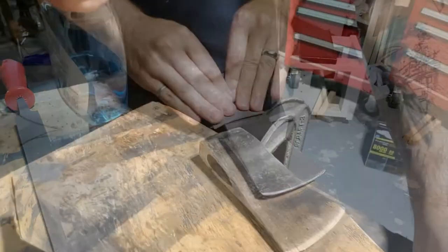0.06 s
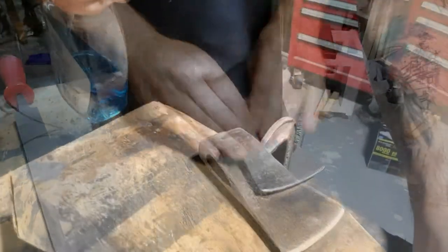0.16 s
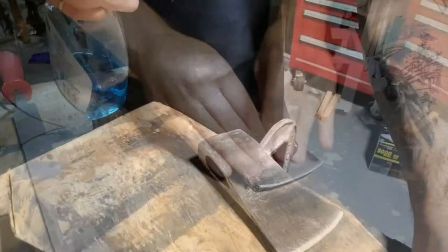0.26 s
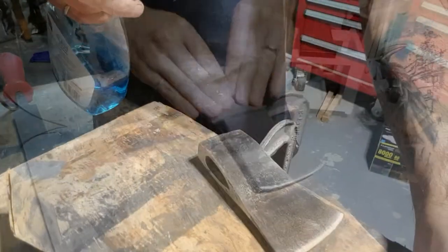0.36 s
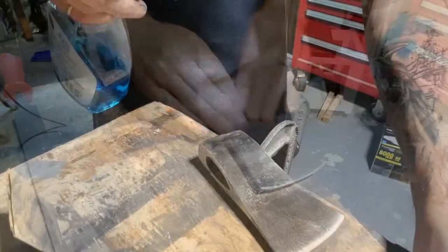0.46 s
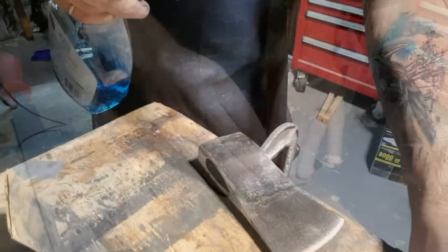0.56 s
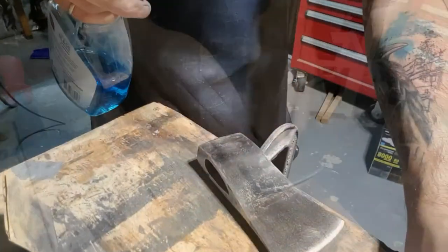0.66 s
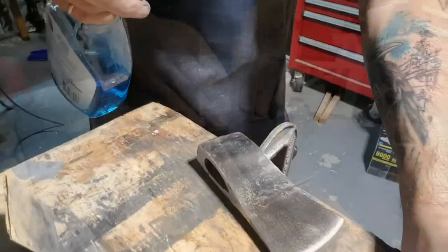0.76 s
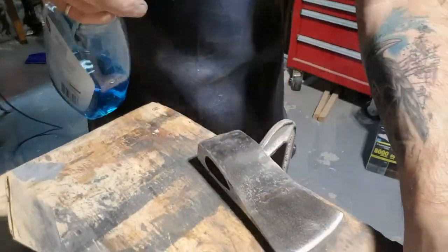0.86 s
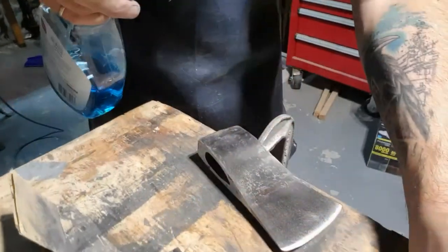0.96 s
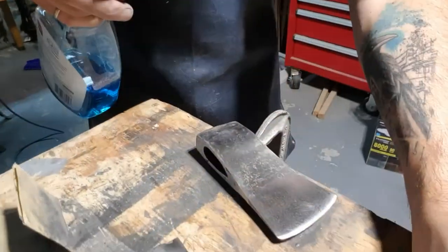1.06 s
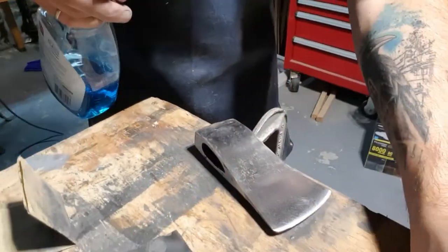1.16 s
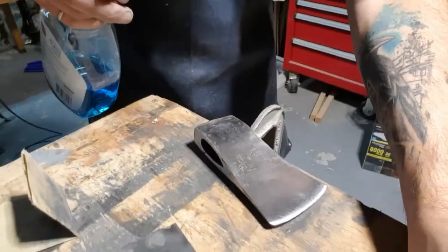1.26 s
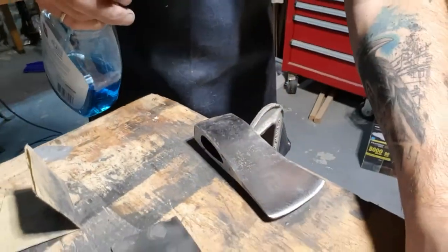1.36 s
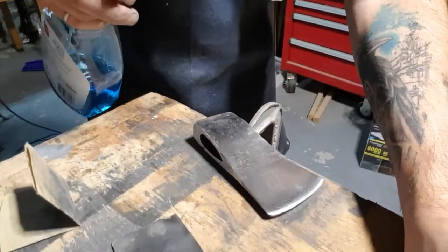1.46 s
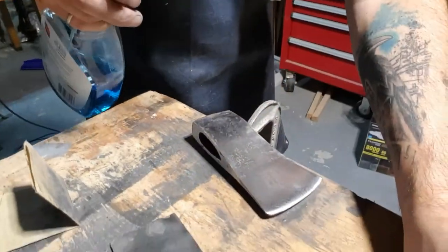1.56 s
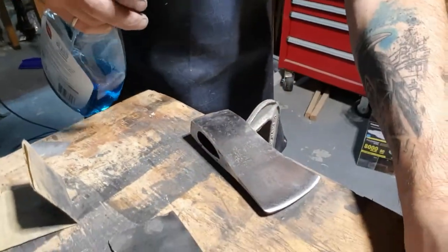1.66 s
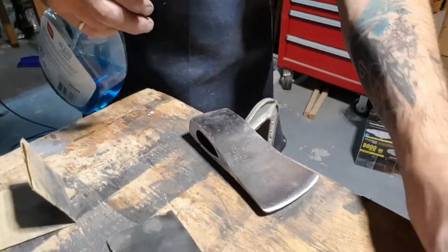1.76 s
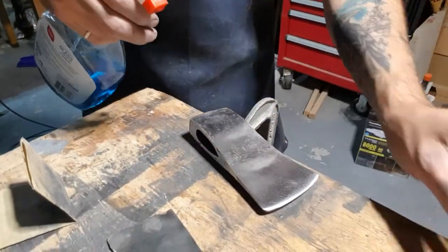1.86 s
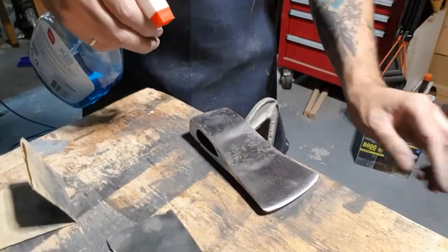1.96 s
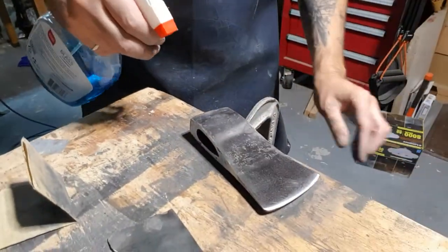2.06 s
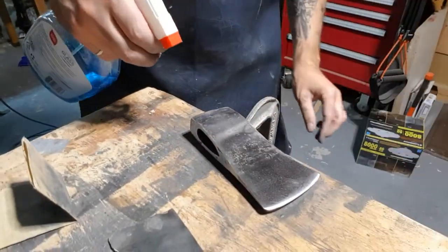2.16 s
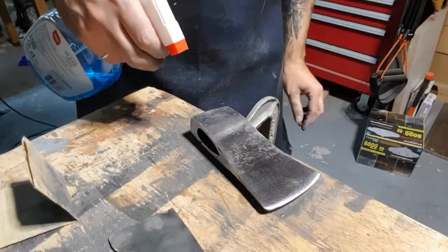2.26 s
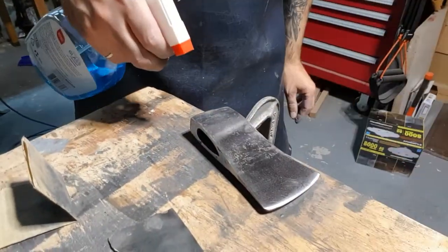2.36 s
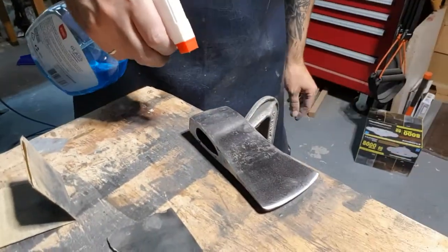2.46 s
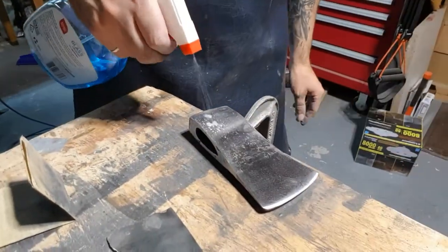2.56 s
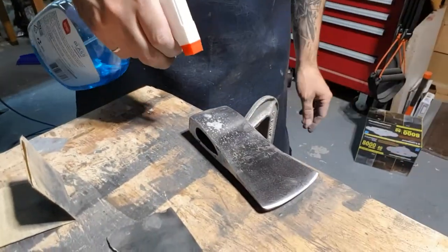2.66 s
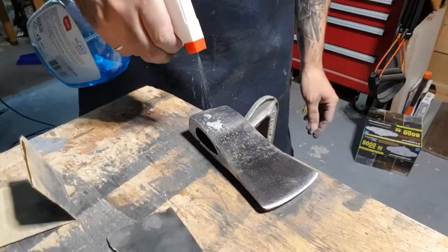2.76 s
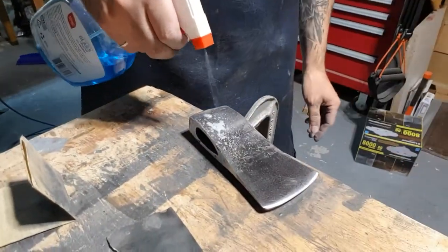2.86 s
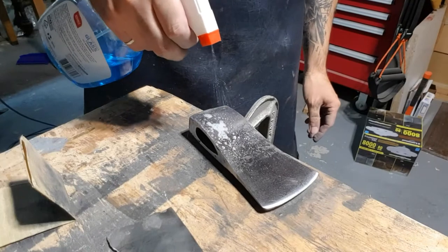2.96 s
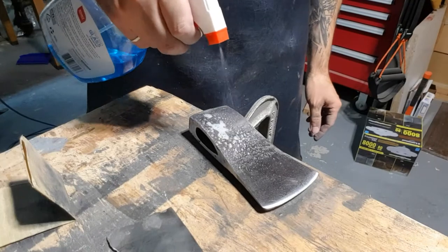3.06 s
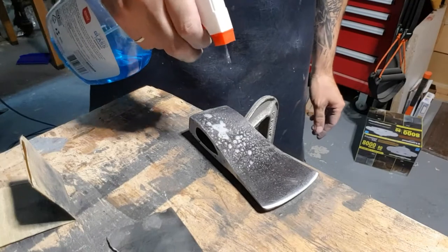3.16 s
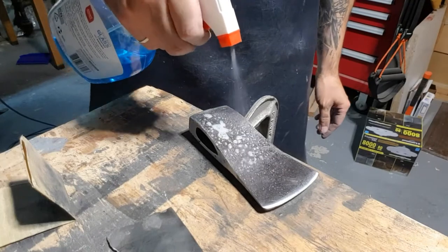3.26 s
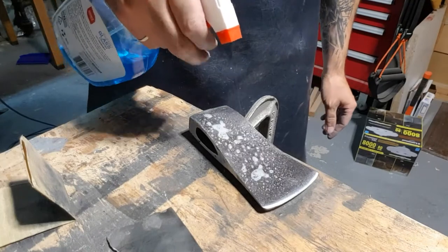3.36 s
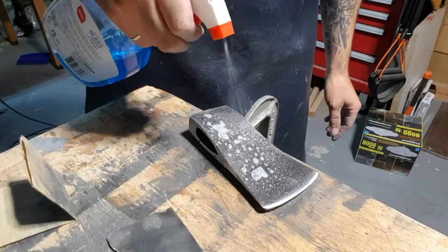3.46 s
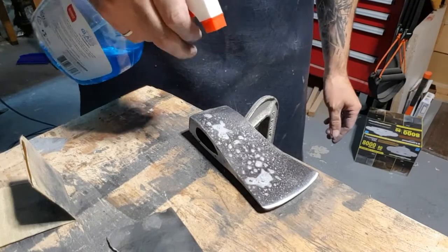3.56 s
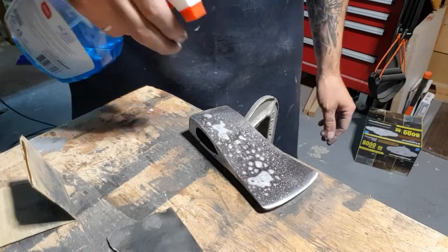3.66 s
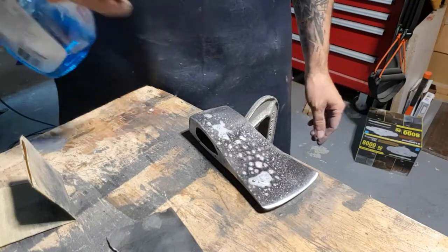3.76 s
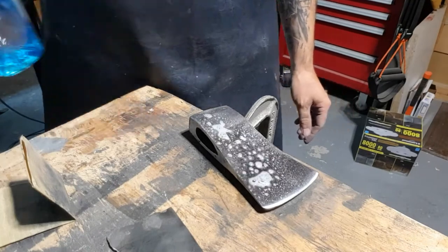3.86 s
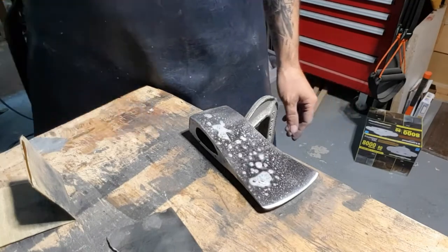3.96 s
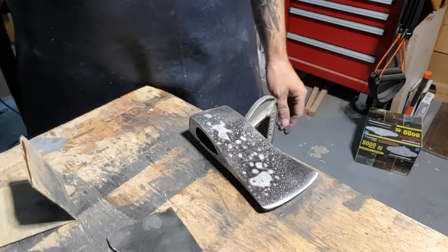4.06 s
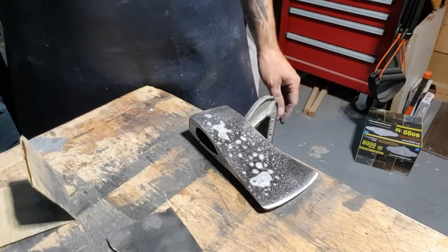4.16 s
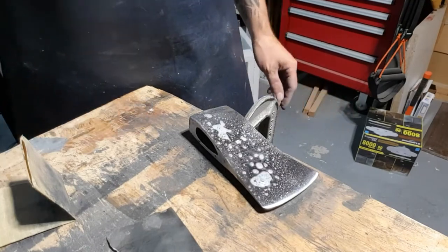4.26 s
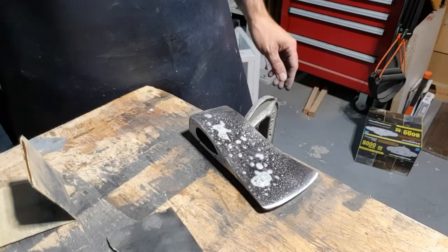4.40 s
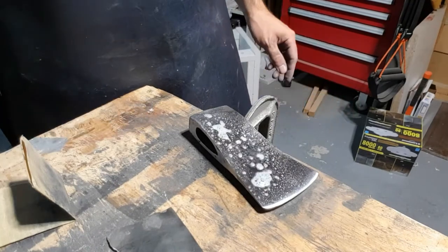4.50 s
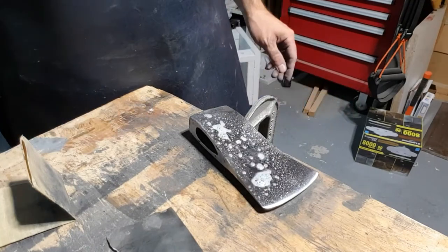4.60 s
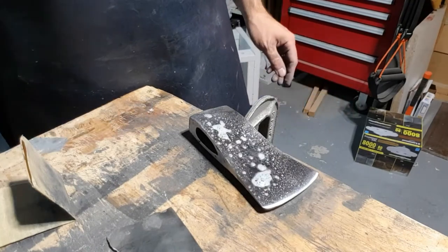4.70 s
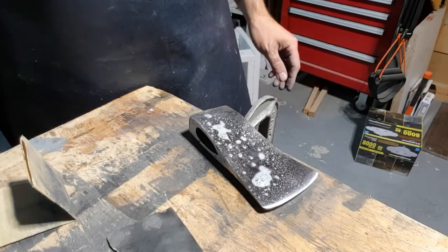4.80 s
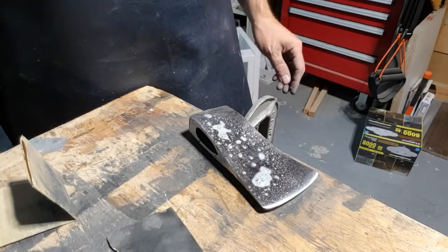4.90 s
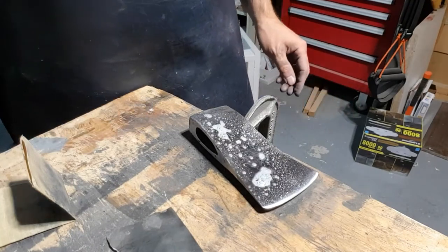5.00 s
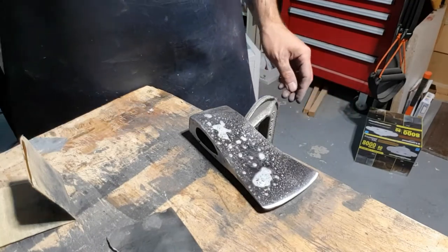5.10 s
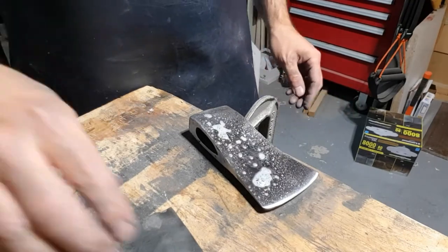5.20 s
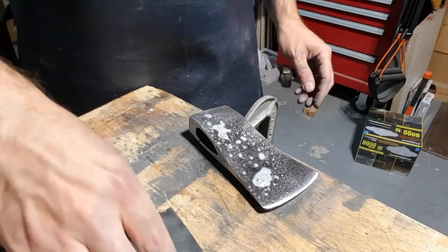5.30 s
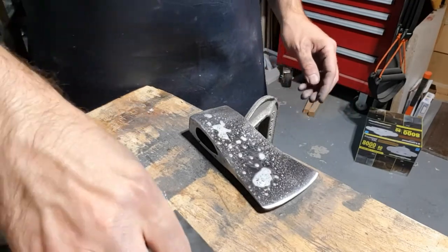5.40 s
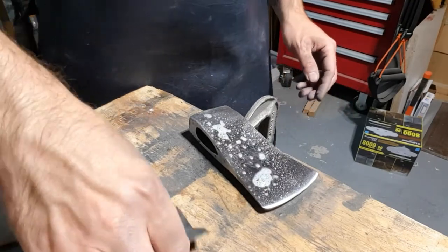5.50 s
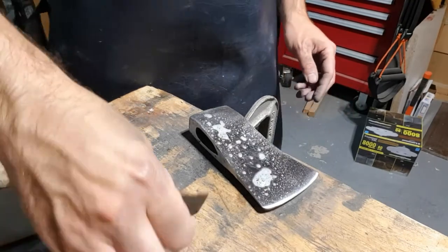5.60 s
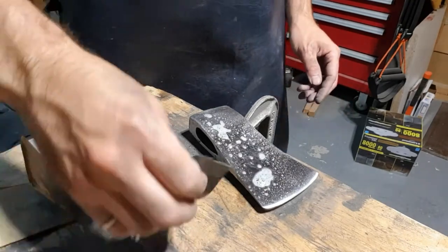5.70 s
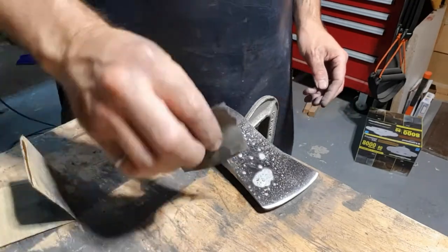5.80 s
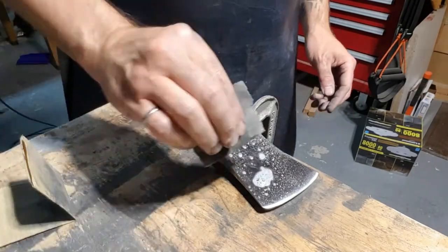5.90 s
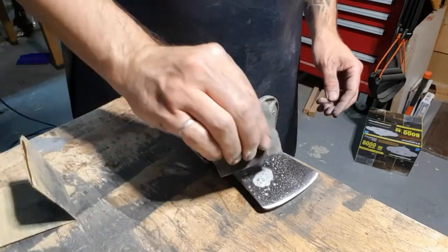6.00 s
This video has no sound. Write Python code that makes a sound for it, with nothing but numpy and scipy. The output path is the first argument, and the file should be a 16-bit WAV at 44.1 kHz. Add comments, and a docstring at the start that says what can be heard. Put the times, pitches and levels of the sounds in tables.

```python
"""Sandpaper strokes on a steel axe head fade away first, then something slides over the bench. A trigger
bottle puffs and sprays in four full squeezes, its piston creaking, and is set down with a knock; a hand
picks up sandpaper. Mains hum and room hiss lie underneath. Rubbing and flow are filtered grainy noise;
the struck shelf and brief ringing in the pump are decaying sines; slips and clicks are pulses and noise
bursts shaped by resonances."""
import sys
import numpy as np
from scipy import signal
from scipy.fft import rfft, irfft, next_fast_len
from scipy.io import wavfile
from scipy.ndimage import uniform_filter1d, map_coordinates

SR = 44100
rng = np.random.default_rng(int(sys.argv[2]) if len(sys.argv) > 2 else 0)


def voltage_ratio(decibels):
    """Convert decibels (scalar or array-like) to amplitude ratios, 20 dB per decade."""
    exponent = np.asarray(decibels, float) / 20
    return 10 ** exponent


def output_pcm(signal):
    """Save a mono or channel-first signal as 16-bit PCM at the path in sys.argv[1].

    Samples are clipped to [-1, 1] before scaling.
    """
    pcm = np.clip(np.atleast_2d(signal).T, -1, 1) * 32767
    wavfile.write(sys.argv[1], SR, np.round(pcm).astype(np.int16))


N = 266364  # samples

# Full squeezes of the trigger. Each row: first piston slip and last slip in seconds, first gap and
# settled gap in milliseconds, settling ratio from gap to gap.
SQUEEZES = [(2.827, 2.985, 28, 11.2, .39), (3.077, 3.197, 21, 12.9, .38), (3.299, 3.385, 21, 6.8, .43),
            (3.523, 3.636, 22, 11.9, .15)]
# Resonances of the bottle. Each row: centre in Hz, width in Hz, relative level in dB.
BOTTLE = [(138, 48, -17), (247, 50, -5.5), (392, 94, -4), (574, 58, -2.5), (780, 115, -5.5),
          (1306, 108, -9.5), (2260, 414, -13.5)]
# Resonances of the nozzle. Each row: centre in Hz, width in Hz, relative level in dB.
NOZZLE = [(6310, 840, -1.5), (8430, 240, 5.5), (10440, 670, 1.5), (14300, 2200, -5.5)]
# Colour of low rubbing. Each row: frequency in Hz, relative density in dB per Hz.
RUB_LOW = [(150, -44), (250, -11), (330, -1.5), (500, 0.5), (590, 1.5), (670, -2), (950, -5.5), (1500, -26),
           (2200, -32)]
# Coherence of close sources. Each row: frequency in Hz, left-right likeness from 0 to 1.
ALIKE = [(60, 0.86), (250, 0.89), (700, 0.73), (1400, 0.79), (3100, 0.5), (7000, 0.11), (12000, 0.08)]
# Coherence of the room and the wide slide. Each row: frequency in Hz, left-right likeness from 0 to 1.
DIFFUSE = [(60, 0.83), (200, 0.46), (1000, 0.11), (3000, 0.24)]
TOP_HZ = 15850  # band limit
RUB_RISE, RUB_FALL = 113, 184  # dB per s
SHELF_LAG_S = 0.000318  # extra delay of the shelf at the left


def sanding():
    """Abrasive friction: many grit contacts make broad noise that excites the steel and the bench."""
    # Each row: stroke start and end in seconds, scrape resonance in Hz, relative bench shake in dB.
    strokes = [(-.12, 0.018, 1990, -45), (0.03, 0.18, 4020, -70), (0.197, 0.351, 2720, -40.5),
               (0.358, 0.505, 3730, -61), (0.527, 0.69, 2950, -44), (0.696, 0.848, 3460, -64),
               (0.871, 1.016, 3100, -39.5)]
    # Grit noise. Each row: frequency in Hz, relative density in dB per Hz.
    grit_colour = [(190, -34), (401, -7), (519, -17), (572, -7), (960, -10.5), (2980, -0.5), (5090, -2.5),
                   (8400, -0.5), (9260, -4), (15800, -3)]
    # Axe head resonances. Each row: centre in Hz, width in Hz, relative level in dB.
    steel = [(1530, 120, 12.5), (8440, 64, 15)]
    bite, bite_s = 0.2, 0.00042  # share of the scrape at first contact, its rise in s
    swell, slowing = 2.43, 0.98  # gain with hand speed, bend of the slow-down
    push_bend, pull_bend = 0.91, 0.87  # how late full speed comes, going away and coming back
    t = np.arange(N) / SR
    scrape = 0
    shake = voltage_ratio(-53.5)  # the bench never rests while sanding
    grit = grains(grit_colour, rough_db=1.5, patchy_db=1.0)
    body = grit + voltage_ratio(-22.0) * unit(filtered(grit, modes(steel)))
    for n, (start, end, hz, shake_db) in enumerate(strokes):
        u = np.clip((t - start) / (end - start), 0, 1)
        bend = pull_bend if n % 2 else push_bend
        # the paper bites at once, then follows the speed of the hand
        speed = (bite + swell * u ** bend) * (1 - u) ** slowing
        speed = speed * np.clip((t - start) / bite_s, 0, 1)
        band = unit(filtered(grit, modes([(hz, 500, 0)])))
        scrape = scrape + voltage_ratio(-31) * speed * (body + voltage_ratio(-17.0) * band)
        most = start + 0.38 * (end - start)  # moment of strongest shaking
        shake = shake + voltage_ratio(shake_db) * gesture(most, most, rise=112, fall=130)
    fade = np.clip(1 - t / 1.023, 0, 1)  # linear, silent after 1.023 s
    return fade * (scrape * voltage_ratio(0.5 * wobble(70.8)) + shake * shaking())


def spray():
    """Stick-slip flow: each slip spits at the nozzle and thumps the bottle twice; flow surges after it."""
    # Moving liquid. Each row: times in seconds from which the rise and the fall are reckoned (they may
    # cross), relative jet hiss in dB, relative gurgle in dB, dB gained while it flows.
    flows = [(2.582, 2.57, -42, -50, 19), (2.632, 2.67, -55.5, -85, -2), (2.751, 2.75, -92, -45, -5),
             (2.828, 2.953, -50, -44.5, -1.5), (3.077, 3.167, -49, -42, -0.5),
             (3.3, 3.364, -49.5, -41, -3.5), (3.524, 3.631, -47.5, -39, -1.5), (3.728, 3.671, -42, -33, -6),
             (3.799, 4.01, -80.5, -63, 2)]
    # Jet noise. Each row: frequency in Hz, relative density in dB per Hz.
    jet_colour = [(590, -21), (1000, -9.5), (1900, -11), (2600, -7), (4650, -9), (7600, -12.5), (8500, -2),
                  (9400, -11), (11500, -5.5), (14200, -10), (15800, -7.5)]
    # Spray cone of each squeeze. Each row: spit peak in Hz, its relative level in dB, jet peak in Hz,
    # its relative level in dB.
    cones = [(11500, -4, 8300, -4.5), (9000, 1.5, 8200, -7), (11100, -4, 13000, -5.5),
             (10750, 1, 16000, -14)]
    flow_rise, jet_fall, gurgle_fall = 4300, 228, 196  # dB per s
    cone_width_hz, build_s = 510, 0.044  # peak width, time scale of the jet's build-up
    t = np.arange(N) / SR
    hiss_gain = sum(voltage_ratio(db) * gesture(a, b, flow_rise, jet_fall, up) for a, b, db, _, up in flows)
    gurgle_gain = sum(voltage_ratio(db) * gesture(a, b, flow_rise, gurgle_fall, up) for a, b, _, db, up in flows)

    at = slips()
    index = np.round(at * SR).astype(int)
    jet_db, gurgle_db = 20 * np.log10(np.array([hiss_gain, gurgle_gain])[:, index])
    spit_scatter, thump_scatter, swing_scatter = 1.5 * rng.standard_normal((len(at), 3)).T  # dB

    white = grains([(2000, -14), (6000, 0), (15800, 0)], rough_db=0)
    nozzle = unit(filtered(white, modes(NOZZLE)))
    jet = grains(jet_colour, rough_db=2.5, patchy_db=1.5)

    def peak(hz, db):
        return voltage_ratio(db) * unit(filtered(white, modes([(hz, cone_width_hz, 0)])))

    build = np.ones(N)
    for (first, last, *_), (spit_hz, spit_db, jet_hz, peak_db) in zip(SQUEEZES, cones):
        during = (t > first - .008) & (t < last + .04)
        nozzle = nozzle + during * peak(spit_hz, spit_db)
        jet = jet + during * peak(jet_hz, peak_db)[::-1]  # sides swapped
        build[during] = np.clip(0.47 + (t[during] - first) / build_s, 0, 1)
    build_db = 20 * np.log10(build[index])

    spit = bursts(at, jet_db + 12 + spit_scatter, t60=.0035, rise_s=0.001) * nozzle
    thump_db = gurgle_db + 9 + 0.22 * build_db
    push = thumps(at, thump_db + 8.0 + thump_scatter)
    # the liquid column swings back and thumps again
    swing_back = thumps(at + 0.00506, thump_db + 13.5 + swing_scatter, t60=0.0035)
    thump = placed(push - swing_back + groans(), wet_db=-6.5)

    squeezing = sum((t > first - .008) & (t < last) for first, last, *_ in SQUEEZES)
    surge = np.where(squeezing, 0.2 + 1.31 * bursts(at, 0 * at, t60=0.067), 1)
    liquid = grains([(110, -30.0), (170, -2), (3000, -2.5)], rough_db=5.0, patchy_db=1.5)
    gurgle = voltage_ratio(-7.5) * gurgle_gain * unit(filtered(liquid, modes(BOTTLE)))
    hiss = voltage_ratio(-2.0 + 1.55 * wobble(70)) * build * hiss_gain * jet
    return surge * (hiss + gurgle) + spit + thump


def slips():
    """Stick-slip timing: the gaps between piston slips relax geometrically to a settled length."""
    times = []
    for first, last, gap_ms, settled_ms, ratio in SQUEEZES:
        gaps_ms = settled_ms + (gap_ms - settled_ms) * ratio ** np.arange(14)
        at = first + np.append(0, np.cumsum(gaps_ms)) / 1000
        times += list(at[at < last])
    return np.array(times)


def groans():
    """Periodic stick-slip: under steady pressure slips come fast and evenly, a hum at their rate."""
    # Each row: start and end in seconds, slips per second, relative level in dB.
    chatter = [(2.912, 2.938, 345, -27.5), (3.564, 3.62, 248, -24)]
    out = 0
    for start, end, rate, db in chatter:
        at = np.arange(start, end, 1 / rate)
        jitter_s = 0.0001 * rng.standard_normal(len(at))
        out = out + thumps(at + jitter_s, db + rng.standard_normal(len(at)))
    return out


def thumps(times, db, t60=0.0069):
    """Forced resonance: short pushes ring the bottle wall, and the small bottle gives no deep bass."""
    return filtered(bursts(times, db, t60), lambda f: modes(BOTTLE)(f) * above(110)(f))


def pump_rings():
    """Free decay: air pockets, and the first slips of two squeezes, ring as short decaying sines."""
    # Each row: start in seconds, pitch in Hz, relative level in dB.
    rings = [(2.5288, 596, -37.5), (2.5548, 1046, -42), (2.587, 1310, -45), (2.654, 1340, -48.5),
             (3.034, 1020, -49), (2.828, 2320, -48.5), (2.856, 2400, -53), (3.078, 2360, -45),
             (3.099, 2330, -47)]
    t, out = np.arange(SR // 10) / SR, np.zeros(N)
    for s, hz, db in rings:
        out[round(s * SR):][:len(t)] += voltage_ratio(db - 60 * t / 0.028) * np.sin(2 * np.pi * hz * t)
    return placed(out, wet_db=-3.5)


def clicks_puffs_and_sloshes():
    """Resonance of short bursts: trigger and valve clicks, small bright puffs of hiss, faint slosh ticks."""
    # Each row: start in seconds, relative mid tick in dB, then low thump and bright burst in dB
    # relative to the tick.
    small_sounds = [(2.4939, -52.5, -7, -16), (2.5291, -47, -19, -5), (2.5538, -49.5, -11, -5),
                    (2.5761, -49, -11, -2), (2.587, -58, 2, 18), (2.632, -61.5, -25, 22),
                    (2.6549, -54.5, -27, 13), (2.7493, -40.5, -33, -18), (2.7572, -56.5, -2, 10.5),
                    (2.7655, -50.5, 3.5, -6), (3.0119, -44, 3.5, -9), (3.3559, -32.5, 3, -33),
                    (3.3755, -44.5, 14.5, -22.5), (3.4301, -34.5, -4, -17), (3.5014, -38.5, -3, -8),
                    (3.544, -40, -12, -17), (3.571, -34, -13, -25), (3.6299, -37, -9, -29),
                    (3.6575, -38.5, 8.5, -23), (3.7264, -45.5, 3, 7.5), (3.7917, -51.5, 10, 3.5),
                    (3.8636, -67.5, 19.5, 3), (3.9089, -56.5, 6, -32), (4.178, -54.5, -0.5, -29),
                    (4.3132, -58.5, 2.5, -13), (4.3852, -65.5, 11.5, -28)]
    # The trigger springs home and the valve snaps just after; columns as above.
    returns = [(3.2282, -42.5, 5.8, 1), (3.4524, -36.5, 6.5, -3)]
    plastic = BOTTLE[5:]
    out = taps(small_sounds, plastic, NOZZLE, t60_mid=0.028, t60_high=0.015)
    return out + taps(returns, plastic, NOZZLE, t60_mid=0.025, t60_high=0.0079, late_s=0.0045)


def knock():
    """Modal impact: the landing bottle rings a wooden shelf over a blurred boom, with a noisy crack."""
    # The bottle lands, rebounds and settles. Each row: start in seconds, relative level in dB.
    landings = [(4.554, -14.5), (4.5765, -29), (4.822, -40.5)]
    # Shelf modes. Each row: frequency in Hz, relative level in dB, time to fall 60 dB in seconds.
    shelf = [(76.8, 2, 0.28), (170.8, 1.5, 0.38), (246, 9.5, 0.078), (295.6, -6, 0.26), (380.3, 2, 0.2),
             (574, -9, 0.1)]
    # Crack noise. Each row: frequency in Hz, relative gain in dB.
    crack_colour = [(250, -30), (600, 7), (1400, 11), (2600, -3), (3600, -11.5), (6000, -22),
                    (15800, -25.5)]
    boom_colour = [(40, -24), (60, 10), (200, 3.0), (450, -11), (700, -69.0)]  # (Hz, dB)
    late_s = 0.0023  # the base slaps flat just after the first push on the shelf
    t, out = np.arange(SR // 2) / SR, np.zeros(N)

    def noise(spectrum):
        return unit(filtered(rng.standard_normal(N), lambda hz: voltage_ratio(along(spectrum, hz))))[:len(t)]

    for s, db in landings:
        ring = sum(voltage_ratio(level - 60 * t / t60) * np.sin(2 * np.pi * hz * t) for hz, level, t60 in shelf)
        boom = voltage_ratio(-2.5 - 60 * t / 0.5) * noise(boom_colour)
        crack = (voltage_ratio(3.0 - 60 * t / 0.031) + voltage_ratio(-17.5 - 60 * t / 0.46)) * noise(crack_colour)
        crack = np.roll(crack, round(late_s * SR)) * (t > late_s)
        push = (ring + boom) * (1 - np.exp(-t / 0.0011))
        out[round(s * SR):][:len(t)] += voltage_ratio(db - 13.0) * (crack - push)
    return aside(placed(out, wet_db=-12.5, near_db=-2.0), SHELF_LAG_S, shade_db=2.0)


def drag():
    """Sliding friction: the bottle's base rubs the shelf, off to the right, and stops."""
    # Each row: time in seconds, relative level in dB.
    rub = [(4.66, -65), (4.72, -61.5), (4.78, -58.5), (4.905, -60), (4.918, -69)]
    # Each row: frequency in Hz, relative density in dB per Hz.
    rub_colour = [(300, 0), (800, 4.5), (1500, -2), (2500, -5.5), (3700, -3), (4300, -15), (9000, -18),
                  (15800, -16)]
    [gain] = levels(rub)
    to_right = voltage_ratio(np.array([[-1.5], [1.5]]))
    return aside(gain * grains(rub_colour, rough_db=3.5, patchy_db=3.5) * to_right, SHELF_LAG_S)


def slide():
    """Sliding friction: a thing pushed along the bench rubs brighter as it rubs louder, crushing grit."""
    # Each row: time in seconds, relative rub level in dB.
    rub = [(0.8, -86), (0.84, -64), (1.16, -50), (1.33, -55.5), (1.44, -58.5), (1.51, -67), (1.62, -65.5),
           (1.7, -94)]
    # Treble rub. Each row: frequency in Hz, relative density in dB per Hz.
    high_colour = [(710, -40), (1200, -4.5), (1790, 0.5), (2150, -4.5), (3450, -2), (8450, -14),
                   (15800, -22)]
    # Hollow sound at full speed: start and end in seconds, centre in Hz, width in Hz, relative level in dB.
    start, end, hz, width, db = (1.1, 1.21, 595, 70, -57)
    full = voltage_ratio(-50)  # rub gain at which the treble is 0.5 dB below it
    [push] = levels(rub)
    high = voltage_ratio(-0.5) * full * (push / full) ** 1.44  # 1.44 dB of treble per dB of rub
    low_rub = push * grains(RUB_LOW, 0, patchy_db=3.0, alike=DIFFUSE)
    high_rub = high * grains(high_colour, rough_db=2.0, patchy_db=2.0, alike=DIFFUSE)
    rubbing = (low_rub + high_rub) * voltage_ratio(np.array([[1.5], [-1.5]]))  # to the left
    cavity = unit(filtered(grains(RUB_LOW, rough_db=-0.5, patchy_db=1.2), modes([(hz, width, 0)])))
    rubbing = rubbing + voltage_ratio(db) * gesture(start, end, RUB_RISE, RUB_FALL) * cavity
    shake = filtered(voltage_ratio(-3.5) * push * shaking(), above(59))
    return shake + aside(voltage_ratio(0.2 * wobble(35.3)) * rubbing + loose_grit(high), -0.00017)


def loose_grit(push):
    """Random fracture: sparse bright cracks of grit at chance moments, scaled by the push."""
    per_s, spread_db = 110, 3.5  # mean rate, size scatter
    chance, size = rng.random((N, 2)).T
    cracks = (chance < per_s / SR) * voltage_ratio(-spread_db * np.log(size + 1e-9)) * push
    puff = signal.fftconvolve(cracks, voltage_ratio(-60 * np.arange(SR // 50) / SR / 0.013))[:N]
    return puff * grains([(1500, 1.5), (5000, 3), (15800, -6)], rough_db=-3.5)


def picking_up_paper():
    """Friction and bending: the hand bumps and brushes the bench, and the bent sheet resonates."""
    # Each row: start and end in seconds, relative rustle in dB, resonance of the bent paper in Hz,
    # relative low rub in dB, relative high rub in dB.
    moves = [(1.744, 1.79, -77, 9000, -72, -69.5), (5.409, 5.42, -49, 7600, -69.5, -58.5),
             (5.507, 5.538, -50.5, 6260, -59.5, -51), (5.598, 5.66, -59.5, 8700, -86, -65),
             (5.656, 5.705, -63.5, 8200, -60.5, -60), (5.774, 5.8, -64.5, 8000, -64, -70),
             (5.887, 5.931, -67, 8400, -93, -72)]
    # The hand lands on the bench. Each row: time in seconds, relative shake in dB.
    bumps = [(5.402, -43), (5.662, -47)]
    # Paper rustle. Each row: frequency in Hz, relative density in dB per Hz.
    rustle_colour = [(1760, -30), (3000, -9), (4600, -6.5), (7200, -1), (12300, -0.5), (15800, -0.5)]
    # High brushing. Each row: frequency in Hz, relative density in dB per Hz.
    brush_colour = [(710, -50), (1200, -5.5), (3000, 4), (4840, -6), (6000, -12), (7800, -28)]
    rustle_rise, rustle_fall = 1300, 340  # dB per s
    low = sum(voltage_ratio(db) * gesture(a, b, RUB_RISE, RUB_FALL) for a, b, *_, db, _ in moves)
    high = sum(voltage_ratio(db) * gesture(a, b, rustle_rise, RUB_FALL) for a, b, *_, db in moves)
    brush = low * grains(RUB_LOW, rough_db=-0.5, patchy_db=1.2) + high * grains(brush_colour, rough_db=0.0)
    sheet = grains(rustle_colour, rough_db=2.5, patchy_db=3.5)
    paper = 0
    for a, b, db, hz, *_ in moves:
        bent = sheet + voltage_ratio(-11) * unit(filtered(sheet, modes([(hz, 610, 0)])))
        paper = paper + voltage_ratio(db) * gesture(a, b, rustle_rise, rustle_fall) * bent
    shake = sum(voltage_ratio(db) * gesture(s, s, rise=880, fall=108) for s, db in bumps)
    return shake * shaking() + aside_paper(voltage_ratio(2.6 * wobble(90)) * (brush + paper))


def paper_and_grit_ticks():
    """Impact excitation: ticks of grit and paper, and the sheet snapping free, excite short resonances."""
    # Each row: start in seconds, relative mid level in dB, then low and treble in dB relative to the mid.
    ticks = [(1.048, -42, -17, -2), (1.1244, -52, -21, 4), (1.4334, -44, -2, -10), (1.6312, -63, -3, 6),
             (2.2929, -57.5, -9, -8), (5.396, -62, 1, -9), (5.412, -55, 4, 13), (5.42, -59, 10, 14),
             (5.6005, -54, -12, 16), (5.723, -40, -15, -24)]
    # The sheet snaps free; columns as for the ticks.
    snaps = [(5.6545, -26, -23, 3), (5.6605, -30.5, -5.5, -8)]
    # Mid resonances. Each row: centre in Hz, width in Hz, relative level in dB.
    mid_modes = [(1310, 870, 20), (2740, 1200, -13)]
    # Treble resonances. Each row: centre in Hz, width in Hz, relative level in dB.
    high_modes = [(7010, 740, 6.9), (11100, 3700, 1), (14200, 2300, 2.3)]
    small = taps(ticks, mid_modes, high_modes, t60_mid=0.012, t60_high=0.0078)
    return small + aside_paper(taps(snaps, mid_modes, high_modes, t60_mid=0.0071, t60_high=0.0041))


def shaking():
    """Forced resonance: rough low noise drives the bench top under working hands."""
    # Each row: centre in Hz, width in Hz, relative level in dB.
    bench = [(57.7, 12, 1), (138.4, 42, -3.5), (230, 15, 4.5), (404, 42, -4)]
    drive = grains([(30, 6), (55, 6), (500, -6), (900, -30)], rough_db=-1, patchy_db=1.5)
    return unit(filtered(drive, modes(bench)))


def room():
    """Changing background: wavering mains partials with rumble below 330 Hz, and a soft hiss above it."""
    # Each row: time in seconds, relative hum level in dB, relative hiss level in dB.
    background = [(0, -99, -47), (1.4, -54.5, -65.5), (1.75, -67, -70), (2.5, -69.5, -69), (3, -60, -60.5),
                  (3.8, -56, -65.5), (4.2, -56.5, -65), (4.53, -59.5, -68.5), (5.3, -57.5, -66.5),
                  (6.04, -59.5, -69)]
    # Hum partials. Each row: frequency in Hz, relative level in dB.
    mains = [(60, 3), (120, 3.5), (242, 2), (361, -11)]
    # Room noise. Each row: frequency in Hz, relative density in dB per Hz.
    air_colour = [(26, -39), (45, 0), (70, -4), (87, -11), (129, -5), (238, -13.5), (270, -12.5),
                  (1230, -19), (4750, -28.5), (9000, -34.5), (12500, -33.5), (15800, -31.5)]
    hum_gain, hiss_gain = levels(background)
    t, hum = np.arange(N) / SR, 0
    for hz, db in mains:
        phase = 2 * np.pi * hz * t + 1.17 * wobble(8.7)
        hum = hum + voltage_ratio(db + 1.2 * wobble(21.07)) * np.sin(phase)
    air = grains(air_colour, rough_db=0.5, patchy_db=1.3, alike=DIFFUSE)
    rumble = unit(filtered(air, lambda hz: hz < 330))
    hiss = unit(filtered(air, lambda hz: hz >= 330))
    return hum_gain * (voltage_ratio(-9.0) * unit(hum) + voltage_ratio(-6.0) * rumble) + hiss_gain * voltage_ratio(-0.5) * hiss


def taps(table, mid, high, t60_mid, t60_high, late_s=0):
    """Resonance of short bursts: a mid tick, a low thump and a bright burst, each dying at its own speed."""
    s, db, low_db, high_db = np.transpose(table)

    def layer(resonances, at, level, t60):
        return unit(filtered(rng.standard_normal(N), modes(resonances))) * bursts(at, level, t60)

    noisy = layer(mid, s, db, t60_mid) + layer(high, s + late_s, db + high_db, t60_high)
    return placed(filtered(noisy, above(260)) - thumps(s, db + low_db + 18), wet_db=-7.5)


def grains(spectrum, rough_db, patchy_db=5.0, alike=ALIKE):
    """Granular noise: tiny uneven contacts, patchy in colour; the mean of the two sides has rms 1."""
    size = voltage_ratio(rough_db * unit(uniform_filter1d(rng.standard_normal(N), size=24)))
    z = signal.stft(rng.standard_normal((2, N)) * size, nperseg=256)[2]
    field = uniform_filter1d(rng.standard_normal(z.shape[1:]), size=6, axis=0)
    field = uniform_filter1d(field, size=14, axis=1)
    pair = signal.istft(z * voltage_ratio(patchy_db * unit(field)), nperseg=256)[1][:, :N]

    def mid_and_side(hz):
        turn = np.arccos(np.clip(along(alike, hz), -1, 1)) / 2  # likeness as an angle
        return voltage_ratio(along(spectrum, hz)) * (hz < TOP_HZ) * [np.cos(turn), np.sin(turn)]

    mid, side = filtered(pair, mid_and_side)
    return np.array([mid + side, mid - side]) / mid.std()


def bursts(times, db, t60, rise_s=0):
    """Exponential decay: an envelope of short puffs that swell for rise_s and die fast."""
    starts = np.bincount(np.round(np.array(times) * SR).astype(int), voltage_ratio(np.array(db)), N)
    t = np.arange(SR // 10) / SR
    swell = np.clip((t + 1 / SR) / (rise_s + 1 / SR), 0, 1)
    puff = swell * voltage_ratio(-60 * np.clip(t - rise_s, 0, None) / t60)
    return np.abs(signal.fftconvolve(starts, puff)[:N])


def gesture(start, end, rise, fall, gained_db=0):
    """Exponential growth and decay: rises until start, falls from end (the two may cross); dB per s."""
    t = np.arange(N) / SR
    # the level changes by gained_db between start and end
    short_db = gained_db * np.clip((end - t) / max(end - start, 1e-3), 0, 1) ** 2
    return voltage_ratio(-rise * np.clip(start - t, 0, None) - fall * np.clip(t - end, 0, None) - short_db)


def placed(x, wet_db, near_db=0.0):
    """Reflection: surfaces near a mono sound differ for each ear, then the walls answer."""
    # Each row: frequency in Hz, time for the walls' answer to fall 60 dB in seconds.
    walls = [(100, 0.9), (500, 0.21), (2000, 0.28), (10000, 0.19)]
    t = np.arange(1024) / SR
    near = rng.standard_normal(len(t)) * voltage_ratio(-60 * t / 0.0048)
    side = signal.fftconvolve(x, near / np.linalg.norm(near))[:N]

    def spread(hz):
        return np.tan(np.arccos(np.clip(along(ALIKE, hz), 0, 1)) / 2) * above(250)(hz)

    side = voltage_ratio(near_db) * filtered(side, spread)
    hz, t, z = signal.stft(rng.standard_normal((2, SR)), SR, nperseg=256)
    tail = signal.istft(z * voltage_ratio(-60 * t / along(walls, hz)[:, None]), SR, nperseg=256)[1]
    tail[:, :round(.006 * SR)] = 0  # the walls answer after 6 ms
    wet = signal.fftconvolve(x[None], tail / np.linalg.norm(tail[0]), axes=1)[:, :N]
    # the deep tail reaches both ears alike
    deep = filtered(wet[0] - wet[1], lambda hz: np.clip(along(ALIKE, hz), 0, 1) ** 2) / 2
    return np.array([x + side, x - side]) + voltage_ratio(wet_db) * (wet - [deep, -deep])


def aside(pair, lag_s, shade_db=0):
    """Interaural delay: the left hears the source lag_s after the right, its treble shaded."""
    def half_right(hz):
        return 1j * np.pi * hz * lag_s + np.log(voltage_ratio(shade_db / 2)) * hz / (hz + 800)

    return filtered(pair, lambda hz: np.exp(half_right(hz) * np.array([[-1], [1]])))


def aside_paper(pair):
    """Interaural delay of the paper, which reaches the left 0.06 ms later."""
    return aside(pair, 0.00006)


def modes(table):
    """Modal superposition: causal response of (Hz, width in Hz, dB) resonances, alternating in sign."""
    def response(f):
        return sum((-1) ** k * voltage_ratio(db) * 1j * f * w / (c * c - f * f + 1j * f * w)
                   for k, (c, w, db) in enumerate(table))
    return response


def above(corner_hz):
    """High-pass response: causal, second order."""
    return lambda f: (1j * f / (corner_hz + 1j * f)) ** 2


def filtered(x, response):
    """Linear filtering: the spectrum of x times a complex response of frequency."""
    m = next_fast_len(N + SR // 2)
    return irfft(rfft(x, m) * response(np.fft.rfftfreq(m, 1 / SR)), m)[..., :N]


def wobble(rate):
    """Slow random modulation: a smooth curve through rate random knots a second."""
    knots = rng.standard_normal(int(N * rate / SR) + 4)
    return map_coordinates(knots, [np.arange(N) * rate / SR])


def levels(table):
    """Level contours: a gain per sample for each dB column against time, -120 dB outside the table."""
    s, *columns = np.transpose(table)
    return np.array([voltage_ratio(np.interp(np.arange(N) / SR, s, c, -120, -120)) for c in columns])


def along(points, hz):
    """Logarithmic pitch scale: (Hz, value) points interpolated on a log axis."""
    f, v = np.transpose(points)
    return np.interp(np.log(hz + 1), np.log(f + 1), v)


def unit(x):
    """Power normalisation: x scaled to rms 1."""
    return x / np.sqrt(np.mean(x ** 2) + 1e-20)


def scene():
    """Superposition of everything at the bench."""
    bottle = aside(spray() + pump_rings() + clicks_puffs_and_sloshes(), 0.00005)
    shelf = knock() + drag()
    paper = picking_up_paper() + paper_and_grit_ticks()
    return aside(sanding(), -0.000038) + bottle + shelf + slide() + paper + room()


def roll_off(x):
    """The treble ends steeply here."""
    return signal.sosfilt(signal.butter(12, 16830, fs=SR, output="sos"), x)


def record(dry):
    """Stereo pickup: the left is a little later and softer; no deep bass, a small constant offset."""
    late = np.array([np.roll(dry[0], 3), dry[1]])  # left later by 3 samples

    def pickup(hz):
        return above(36)(hz) ** 2 * np.where(hz < TOP_HZ, 1, voltage_ratio(-14))

    heard = filtered(late, pickup) * voltage_ratio(np.array([[-.3], [.3]]))
    return roll_off(heard - .0005)


dry = scene()
out = record(dry)
output_pcm(out)
```